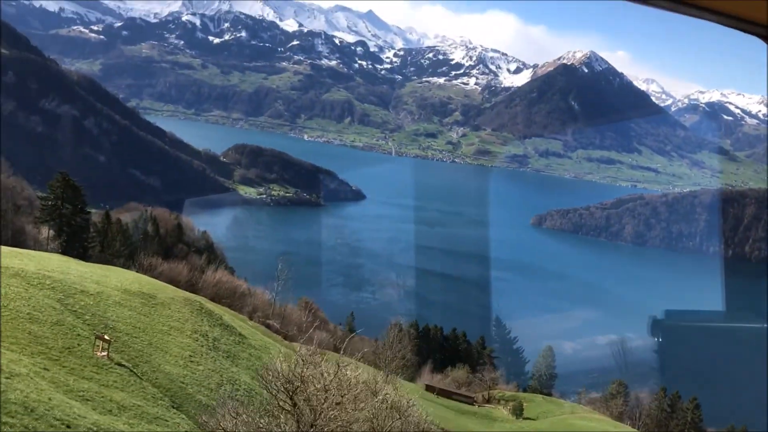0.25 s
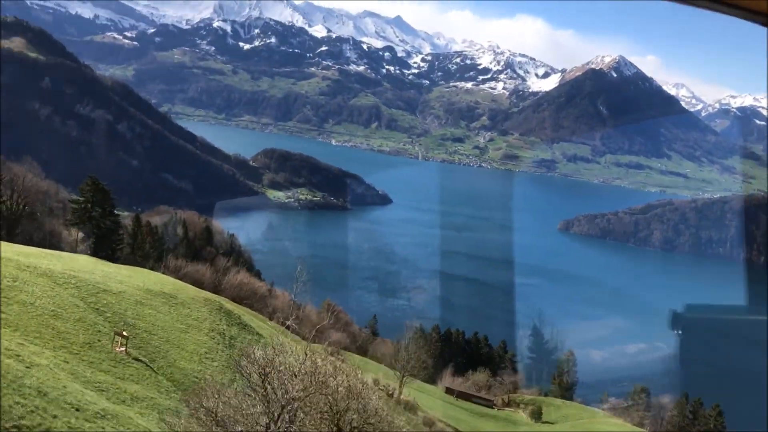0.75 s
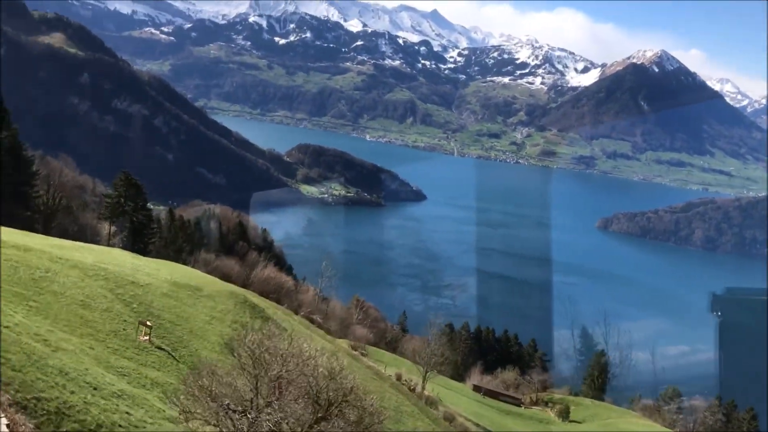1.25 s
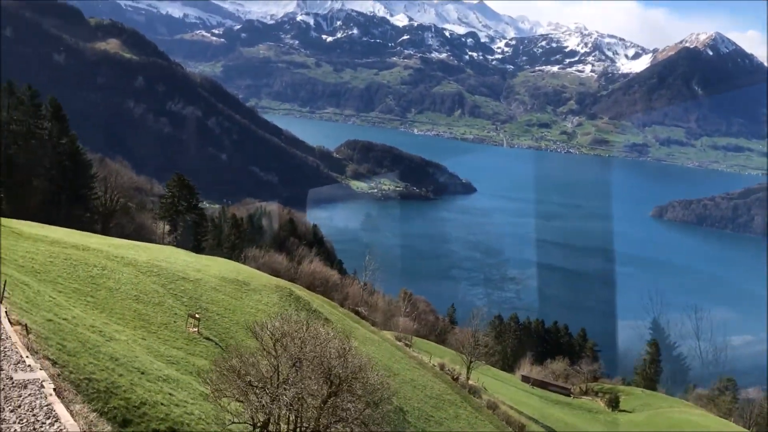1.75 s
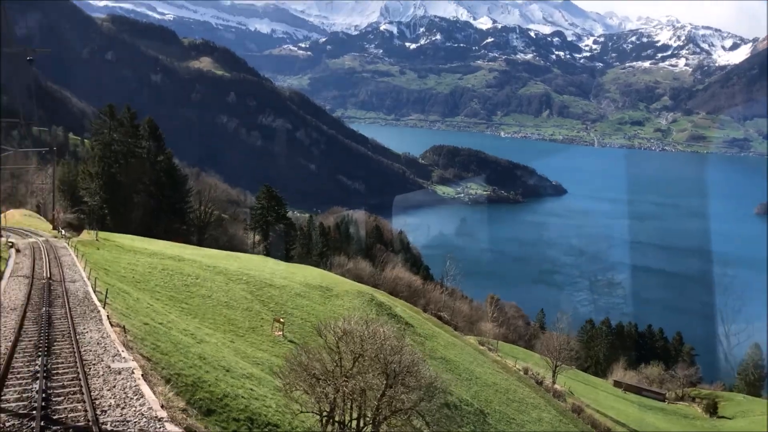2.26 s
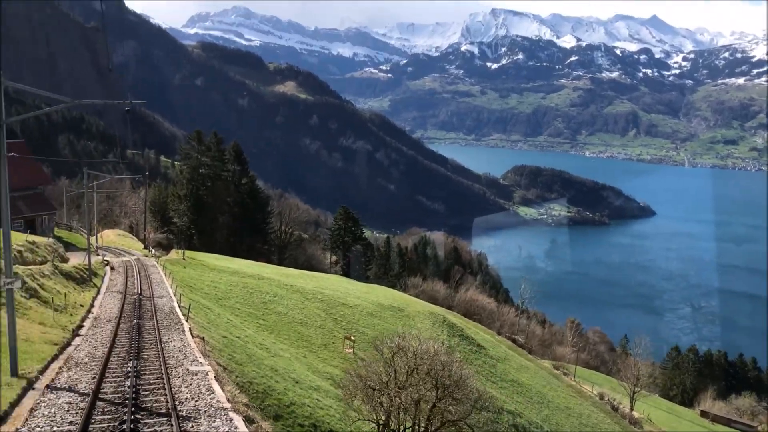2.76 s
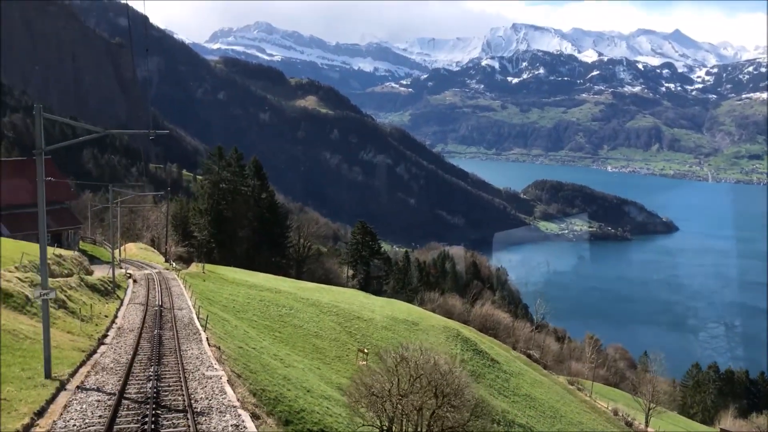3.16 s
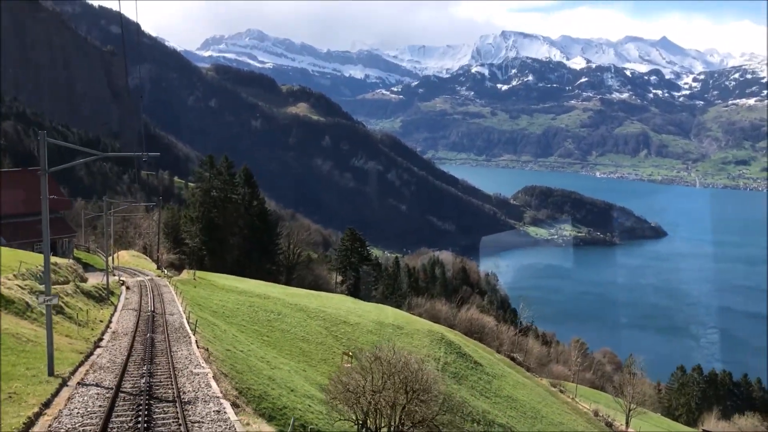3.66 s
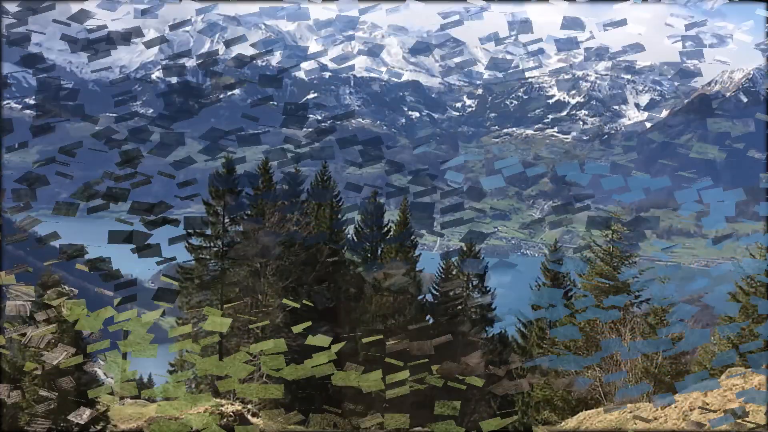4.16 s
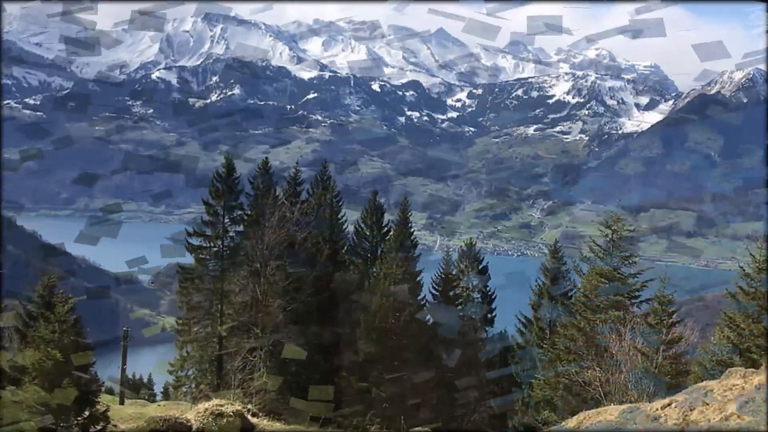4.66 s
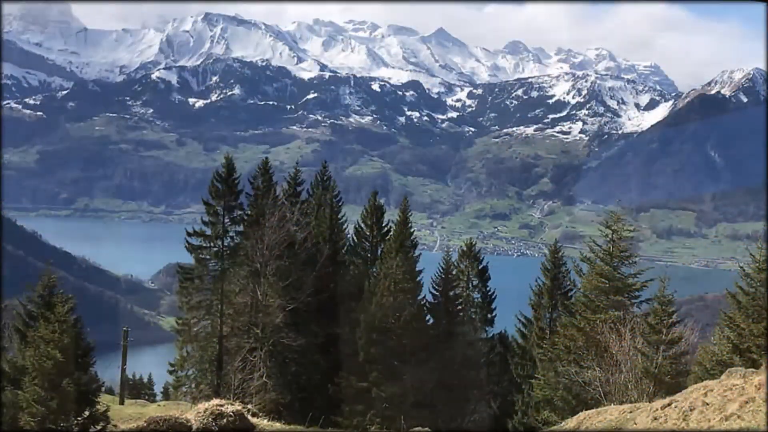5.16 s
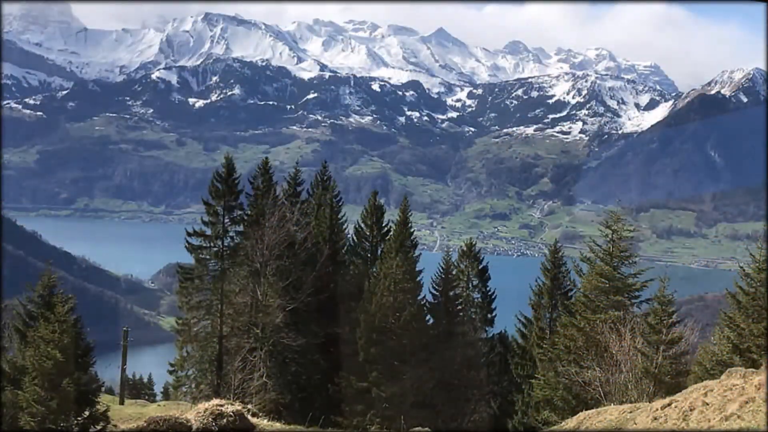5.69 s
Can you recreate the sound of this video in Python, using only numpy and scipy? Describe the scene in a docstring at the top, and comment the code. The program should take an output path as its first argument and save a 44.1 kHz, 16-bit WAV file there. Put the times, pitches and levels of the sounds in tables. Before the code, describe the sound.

A mono microphone inside a moving mountain train picks up low swelling rumble, humming drive and a faint singing of gear teeth. Light dry ticks with small rebounds run quickly and evenly, while fittings rattle very quietly. Soft bumps pass below, brief faint squeaks follow near three seconds, then a scrape and a hard panel knock precede a sudden stop.

```python
"""Inside the carriage of a rack railway: filtered noise makes the boom, rumble and hiss of the ride.
Sines make the hum of the drive and the faint singing of the pinion, the toothed wheel on the rack.
A loose part ticks six times a second with an extra tick every sixth: snaps of noise and short rings.
Noise bursts thud at rail joints, ringing noise makes brief metal squeaks, and fittings rattle faintly.
Late on, a scrape leads into one knock of close blows on a ringing panel; then the sound stops short."""
import sys
import numpy as np
from scipy import signal
from scipy.fft import rfft, irfft
from scipy.io import wavfile

SR = 44100
rng = np.random.default_rng(int(sys.argv[2]) if len(sys.argv) > 2 else 0)


def unload_audio(sound):
    """Save the sound as a 16-bit wav file, at the path given as the first command line argument."""
    columns = np.transpose(np.atleast_2d(sound))
    # keep every value between -1 and 1, then stretch to whole-number steps
    steps = np.round(np.clip(columns, -1, 1) * 32767)
    wavfile.write(sys.argv[1], SR, steps.astype(np.int16))


N = 261362   # length in samples

# In every noise colour only the shape counts: the noise is scaled to the same strength afterwards.
# colour of the rolling and rubbing hiss: (frequency [Hz], level [dB per Hz])
HISS_COLOUR = [(820, -23), (1400, -2), (1830, -5), (2020, -2.5), (3050, -5.5), (4060, -6.5), (4890, -13),
               (6310, -12), (7750, -19), (8500, -16.5), (10600, -25.5), (15100, -25), (16200, -35.5)]
# colour of the rattle and the scrape: (frequency [Hz], level [dB per Hz])
RATTLE_COLOUR = [(1200, -25), (2200, -2), (4000, 0.1), (6500, -4), (9000, -18), (14000, -30)]
# resonances of the wall panels: (frequency [Hz], width [Hz], lift [dB])
PANEL_RESONANCES = [(198.2, 35, 5.5), (291, 12, 3), (560, 72, 1), (624, 45, 5.5), (691, 66, 11),
                    (1423, 23, 9.5), (3830, 220, -0.5), (5540, 200, 4)]


def from_db(db):
    """Turn a level in dB into a factor to multiply by."""
    return 10 ** (np.asarray(db) / 20)


def rms_one(x):
    """Scale a signal to an average strength (rms) of 1."""
    return x / np.sqrt(np.mean(x ** 2) + 1e-20)


def in_time(rows):
    """Join the (time, level) points of a table by straight lines, one value per sample."""
    time_s, level = np.transpose(rows)
    return np.interp(np.arange(N) / SR, time_s, level)


def drift(rate):
    """Slow random wandering with about this many changes a second and a spread of 1."""
    # computed at every 40th sample; the first 2000 values let the filter settle
    r = np.exp(-80 * np.pi * rate / SR)
    chance = rng.standard_normal(N // 40 + 2002)
    slow = rms_one(signal.lfilter([1], [1, -2 * r, r * r], chance)[2000:])
    return np.interp(np.arange(N) / 40, np.arange(len(slow)), slow)


def coloured(spectrum, peaks=()):
    """Noise of rms 1 with the given spectrum, lifted around the given resonances."""
    hz = np.fft.rfftfreq(N, 1 / SR) + 1
    at_hz, level = np.transpose(spectrum)
    level_db = np.interp(np.log(hz), np.log(at_hz), level, left=-90, right=-90)
    for centre, width, lift_db in peaks:
        level_db = level_db + lift_db / (1 + (2 * (hz - centre) / width) ** 2)
    white = rfft(rng.standard_normal(N))
    return rms_one(irfft(white * from_db(level_db), N))


def below(noise, cutoff_hz):
    """The part of a noise below the cutoff, by a gentle low-pass filter."""
    return signal.sosfilt(signal.butter(2, cutoff_hz, fs=SR, output="sos"), noise)


def ring(force, hz, t60):
    """A resonance: a click of 1 starts a sine of height 1 that falls 60 dB in t60 seconds."""
    r, w = from_db(-60 / (t60 * SR)), 2 * np.pi * hz / SR
    return signal.lfilter([0, np.sin(w)], [1, -2 * r * np.cos(w), r * r], force + 1e-18)


def struck(at_s, gain, decay_s, rise_s=0.00068):
    """Envelope that rises fast at each given moment and dies away."""
    strength = np.zeros(N)
    np.add.at(strength, np.round(np.asarray(at_s) * SR).astype(int), gain)
    dying = signal.lfilter([1], [1, -np.exp(-1 / (decay_s * SR))], strength + 1e-18)
    r = np.exp(-1 / (rise_s * SR))
    return signal.lfilter([1 - r], [1, -r], dying)


def swell(start, end):
    """Envelope of a rub: rises fast, rounds over and dies fast."""
    progress = np.clip((np.arange(N) / SR - start) / (end - start), 0, 1)
    return np.sqrt(np.abs(np.sin(np.pi * progress)))


def tones(start_hz, slowing, level, orders, waver_db, wander):
    """Multiples of a slowly falling turning speed, each wavering in level by itself."""
    hz = start_hz * (1 - slowing * np.arange(N) / SR)
    level_db = in_time(level)
    phase = 2 * np.pi * np.cumsum(hz * (1 + wander * drift(3.18))) / SR
    total = np.zeros(N)
    for multiple, db in orders:
        gain = np.sqrt(2) * from_db(level_db + db + waver_db * drift(3.1))
        total += gain * np.sin(round(multiple) * phase + rng.uniform(0, 2 * np.pi))
    return total


def held_tone(start, end, hz, level_db, t60):
    """Stick and slip keep one resonance sounding unevenly: noise rings it while its level wavers."""
    tone = rms_one(ring(rng.standard_normal(N), hz, t60))
    return from_db(level_db + 2.5 * drift(25)) * swell(start, end) * tone


def carriage():
    """Rail roughness shakes the body: the cabin air booms, the panels rumble, the rolling hisses."""
    # colours of boom and rumble: (frequency [Hz], level [dB per Hz])
    boom_colour = [(22, -31), (38, -1), (95, 2), (170, -24), (220, -59.5), (370, -120)]
    rumble_colour = [(65, -49.5), (110, -8.5), (166, -11.5), (362, -16), (426, -24.5), (527, -17.5),
                     (686, -29), (768, -25), (962, -26.5), (1300, -30), (1420, -33.5), (1820, -43),
                     (2200, -56), (2860, -80), (4840, -120)]
    # the boom swelling and sinking: (time [s], level [dB])
    boom_level = [(0, -9.5), (.16, -19.5), (.22, -23.5), (.5, -20.5), (.57, -8.5), (.79, -27), (.88, -16),
                  (.98, -16.5), (1.07, -9), (1.73, -20), (2.1, -17.5), (2.45, -13), (2.87, -13.5),
                  (3, -19.5), (3.1, -18), (3.68, -15), (3.79, -17), (4.57, -15.5), (4.66, -21),
                  (4.72, -12.5), (5.28, -14.5)]
    # strength of the panel rumble: (time [s], level [dB])
    rumble_level = [(0, -30), (.65, -29.5), (.88, -28), (1.05, -29), (2, -31), (2.16, -29.5), (2.3, -30),
                    (4.95, -31), (5.08, -28), (5.3, -34)]
    hiss_db = -46.5
    jolts = drift(8.9)   # jolts lift rumble and hiss together
    boom = from_db(in_time(boom_level) + 1.2 * drift(12)) * coloured(boom_colour)
    rumble_gain = from_db(in_time(rumble_level) + .8 * jolts + 0.783 * drift(27))
    rumble = rumble_gain * coloured(rumble_colour, PANEL_RESONANCES)
    hiss_gain = from_db(hiss_db + .7 * jolts + 1.01 * drift(30))
    hiss = hiss_gain * coloured(HISS_COLOUR, PANEL_RESONANCES)
    return boom + rumble + hiss


def rattle():
    """Fittings touch faintly at random: 90 tiny bursts of noise, a few of them stronger."""
    at_s = rng.uniform(0, 5.9, 90)
    size_db = -50 + 3 * np.minimum(rng.exponential(1, len(at_s)), 3)
    return struck(at_s, from_db(size_db), 0.0088) * coloured(RATTLE_COLOUR, PANEL_RESONANCES)


def drive_hum():
    """The turning drive hums at its own low note and multiples of it."""
    # strength of the hum: (time [s], level [dB])
    hum_level = [(0, -13), (.6, -14), (1.5, -18), (2, -15), (3, -16), (3.5, -13.5), (4, -16.5), (4.5, -14),
                 (5, -22.5), (5.3, -54.5)]
    # notes of the hum: (multiple of the turning speed [-], level [dB])
    hum_orders = [(1, -5.5), (2, -9), (3, -21)]
    # slowing: share of the starting speed lost each second
    return tones(49.46, .006, hum_level, hum_orders, waver_db=2.5, wander=.004)


def rack_mesh():
    """The teeth of the pinion meet the rack regularly, which sings as faint tones."""
    # strength of the singing: (time [s], level [dB])
    mesh_level = [(0, -37), (2.1, -37), (2.5, -42), (5.3, -42)]
    # notes of the singing: (multiple of the lowest note [-], level [dB])
    mesh_orders = [(1, -9), (2, -3.5), (3, -13), (4, -11)]
    return tones(128.3, .0018, mesh_level, mesh_orders, waver_db=4.0, wander=0.0061)


def thuds():
    """Rail joints and lurches thud through the floor: soft-edged bursts of dull and bright noise."""
    # each thud: (time [s], level [dB], share of bright noise [0-1])
    thud_rows = [(.49, -36, 0.14), (0.555, -17, 0.08), (.765, -29.5, 0.66), (.86, -30.5, 0.8),
                 (1.08, -25, 0.15), (2.145, -25, 0.57), (2.431, -42, 0.03), (3.661, -33, 0.2),
                 (3.961, -16.5, 0.05), (5.05, -21.5, 0.15), (5.199, -20.5, 0.04)]
    # colours of the dull and the bright noise: (frequency [Hz], level [dB per Hz])
    dull_colour = [(35, -20), (60, -4), (120, 11), (200, 17), (330, -2), (500, -42.5)]
    bright_colour = [(200, -17), (330, 4.5), (700, -13), (1200, -9), (2000, -17.5), (3500, -28)]
    at_s, level_db, bright = np.transpose(thud_rows)
    bright = np.clip(bright, 0, 1)
    gain = from_db(level_db)
    dull_part = struck(at_s, gain * (1 - bright), 0.034, rise_s=.008) * coloured(dull_colour)
    bright_part = struck(at_s, gain * bright, 0.046, rise_s=0.0054) * coloured(bright_colour)
    return dull_part + bright_part


def squeaks():
    """Rubbing metal hisses and sounds many resonances, each coming and going by itself."""
    # each squeak: (start [s], end [s], level [dB])
    squeak_rows = [(2.93, 3.055, -51), (3.28, 3.40, -56.5)]
    # resonances of the metal: (frequency [Hz], level [dB])
    squeak_modes = [(2850, -5), (3160, -5), (3580, -5), (3760, -1), (4230, -5), (4880, 1.5), (5500, -8),
                    (6300, -11), (8660, -9), (10000, -16), (11300, -17), (12600, -19)]
    # one brief thin tone: (start [s], end [s], frequency [Hz], level [dB])
    whistle = (2.12, 2.2, 1974, -52)
    hiss_over_squeak_db = 5.5
    rubbed, rubbing = np.zeros(N), np.zeros(N)
    for start, end, level_db in squeak_rows:
        rubbing += from_db(level_db + hiss_over_squeak_db) * swell(start, end)
        for hz, db in squeak_modes:
            rubbed += held_tone(start, end, hz, level_db + db, t60=.09)
    return rubbed + rubbing * coloured(HISS_COLOUR) + held_tone(*whistle, t60=0.12)


def knock():
    """A scrape leads in; a few blows ring a hollow panel inside a crackling rush of noise."""
    # each blow: (time [s], level [dB])
    blows = [(4.655, -21.5), (4.659, -17), (4.6622, -10), (4.6655, -22), (4.672, -16), (4.679, -15)]
    # resonances of the panel: (frequency [Hz], level [dB], time to fall 60 dB [s])
    panel_modes = [(288, 0, 0.038), (502, 3, 0.044), (596, -0.5, 0.049), (400.6, -11.5, 0.016),
                   (800, -23, 0.012), (1544, -14.5, .03), (2352, -10, 0.046), (3150, -15, 0.038)]
    # colour of the rush: (frequency [Hz], level [dB per Hz])
    rush_colour = [(440, -28.5), (700, -2), (1030, -6.5), (1560, -7), (2240, -17.5), (3010, -10),
                   (3550, -14), (6020, -15), (13500, -30), (16200, -40)]
    scrape_start_s, scrape_db = 4.585, -42
    rush_db, treble_db = -21.5, 2
    rise_s, hold_s = .005, 0.044
    # the sag acts throughout, the fade adds to it after the hold; the treble falls faster throughout
    sag_db_per_s, fade_db_per_s, treble_fade_db_per_s = 90, 189, 88.5

    force = np.zeros(N)
    for at_s, level_db in blows:
        force[round(at_s * SR)] = from_db(level_db)
    rings = sum(from_db(db) * ring(force, hz, t60) for hz, db, t60 in panel_modes)

    noise = coloured(rush_colour)
    dull = below(noise, 7000)
    first_s = blows[0][0]
    since = np.maximum(np.arange(N) / SR - first_s + rise_s, 0)   # seconds since the rush began
    level_db = rush_db - sag_db_per_s * since - fade_db_per_s * np.maximum(since - hold_s, 0)
    crackle_db = 2 * drift(150)
    rush = np.minimum(since / rise_s, 1) * from_db(level_db + crackle_db)
    treble = from_db(treble_db - treble_fade_db_per_s * since)

    scrape_gain = from_db(scrape_db + 3 * drift(100)) * swell(scrape_start_s, first_s + .02)
    scrape = scrape_gain * coloured(RATTLE_COLOUR, PANEL_RESONANCES)
    return rings + rush * (dull + treble * (noise - dull)) + scrape


def tick_rows():
    """The loose part makes the same contacts each turn, with small changes; stray ticks join them."""
    # contacts in one turn: (time into the turn [s], level [dB], rebound [dB], brightness [dB])
    contacts = [(0, -24.5, -14.5, 0), (0.0643, -23.5, -18, -5.5), (0.162, -22.5, -13, -0.5),
                (0.3247, -22, -4, -4.5), (0.4868, -22, -10.5, 0.5), (0.652, -22, -7.5, -5),
                (0.8184, -21, -11.5, -3)]
    # stray dull ticks between the contacts: (time [s], level [dB])
    stray_ticks = [(0.843, -24), (1.858, -30), (2.5043, -28.5), (3.669, -25.5), (5.011, -31)]
    turn_s, first_turn_s = .98306, .1082
    # random change of each contact: time [s], then level, rebound and brightness [dB]
    scatter = np.array([.0005, 1.2, 4, 2.5])
    rows = np.array([(first_turn_s + turn * turn_s + s, *db) for turn in range(6) for s, *db in contacts])
    rows = rows + rng.standard_normal(rows.shape) * scatter
    strays = [(s, db, -16, -25) for s, db in stray_ticks]   # weak rebound, little brightness
    return np.r_[rows, strays]


def ticks():
    """Each tick is a dry snap of noise with a rebound; it rings short modes of varying strength."""
    # colour of the snap: (frequency [Hz], level [dB per Hz])
    snap_colour = [(700, -19.5), (1500, -1.5), (2300, -4.5), (4000, -3), (7000, -4.5), (10000, -6.5),
                   (13000, -11.5), (16400, -15.5)]
    # resonances of the loose part: (frequency [Hz], level [dB], time to fall 60 dB [s])
    tick_modes = [(2330, 1.5, 0.058), (2885, -18, 0.041), (3770, 3, 0.025), (4150, 5, .02),
                  (5320, 0.5, 0.022), (6190, 9, .015), (6690, -2.5, 0.0093)]
    rebound_s, contact_s = .019, .0028   # delay of the rebound; decay of the bright part
    at_s, peak_db, rebound_db, bright_db = tick_rows().T
    both_s = np.r_[at_s, at_s + rebound_s]   # first contacts, then their rebounds
    level_db = np.r_[peak_db, peak_db + rebound_db]
    bright_db = np.r_[bright_db, bright_db - 3]
    snap = coloured(snap_colour)
    dull = below(snap, 6000)
    out = struck(both_s, from_db(level_db - 14), 2.2 * contact_s) * dull   # the lower part lasts longer
    out += struck(both_s, from_db(level_db + bright_db - 11.5), contact_s) * (snap - dull)
    out += struck(both_s, from_db(level_db - 21.5), 0.021) * snap   # the cabin answers with a short tail
    chance = rng.standard_normal((len(both_s), len(tick_modes)))
    for k, (hz, mode_db, t60) in enumerate(tick_modes):
        gain = from_db(level_db + mode_db - 35 + 2.5 * chance[:, k])
        force = struck(both_s, gain, .002) * rng.standard_normal(N)
        out += ring(force, hz, t60)
    return out


def scene():
    """All sources added together in one channel."""
    background = carriage() + rattle()
    drive = drive_hum() + rack_mesh()
    events = thuds() + squeaks() + knock() + ticks()
    return (background + drive + events)[None]


def record(dry):
    """The microphone loses the deepest bass, peaks are rounded, the sound stops short, the top is cut."""
    top, stop_s, cutoff_hz = .97, 5.2863, 16450
    heard = signal.sosfilt(signal.butter(6, 37, "high", fs=SR, output="sos"), dry)
    rounded = heard / (1 + np.abs(heard / top) ** 6) ** (1 / 6)
    running = np.arange(N) < stop_s * SR
    return signal.sosfilt(signal.cheby2(12, 50, cutoff_hz, fs=SR, output="sos"), running * rounded)


dry = scene()
out = record(dry)
unload_audio(out)
```